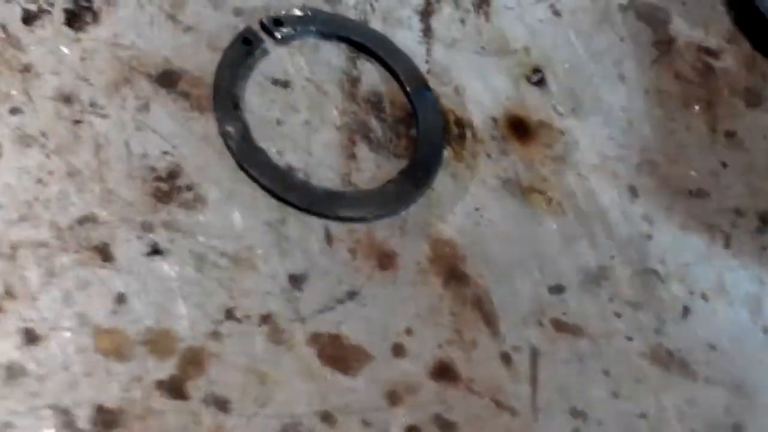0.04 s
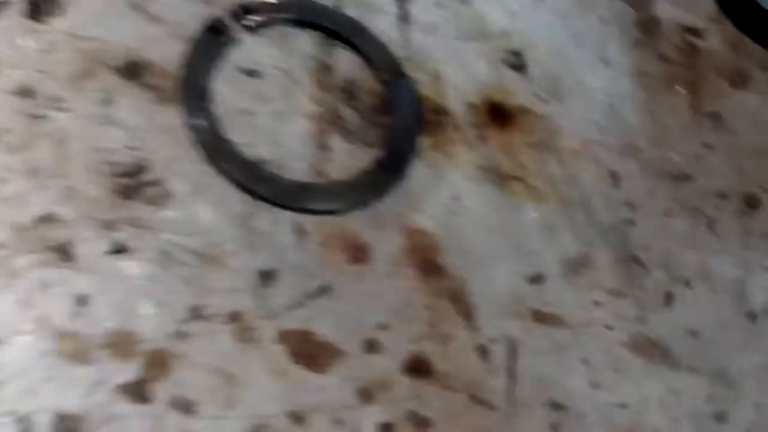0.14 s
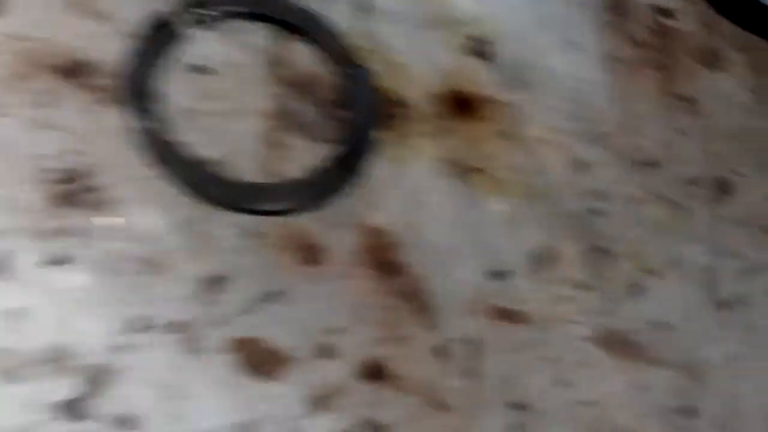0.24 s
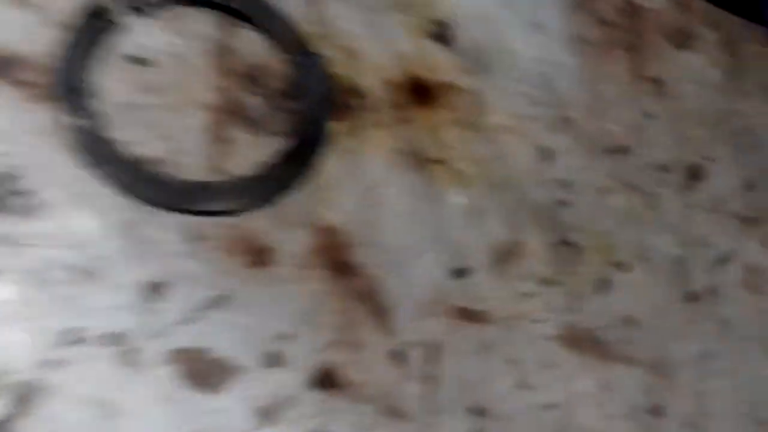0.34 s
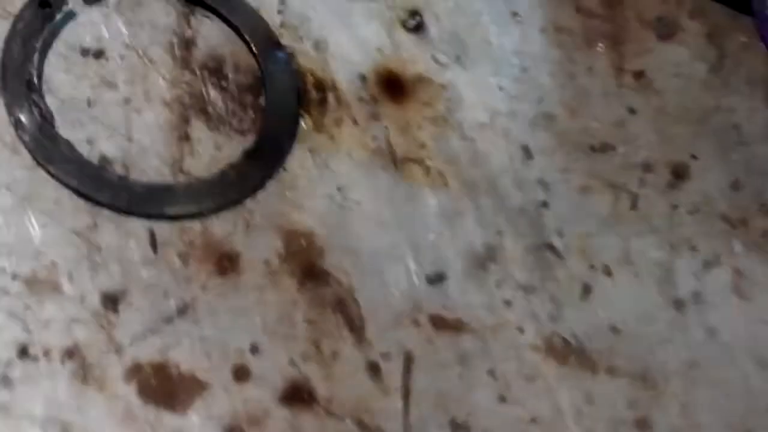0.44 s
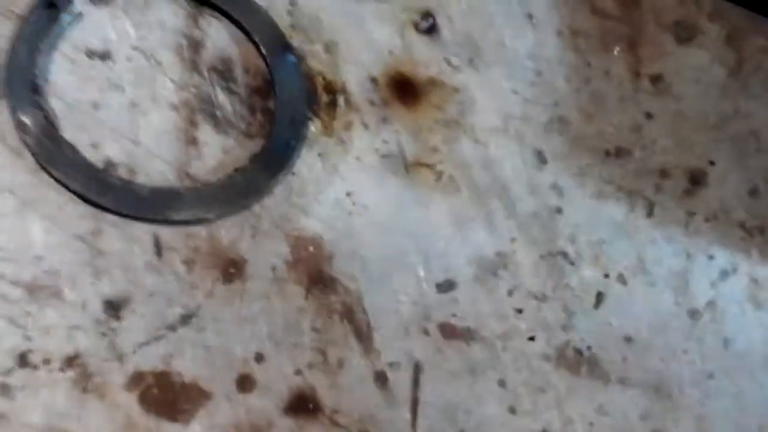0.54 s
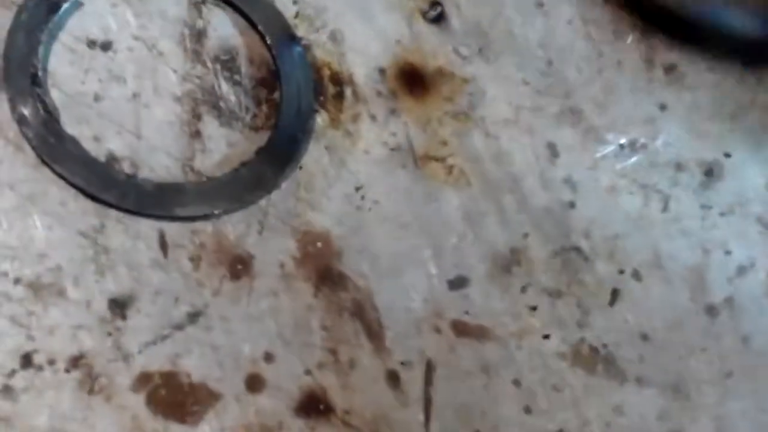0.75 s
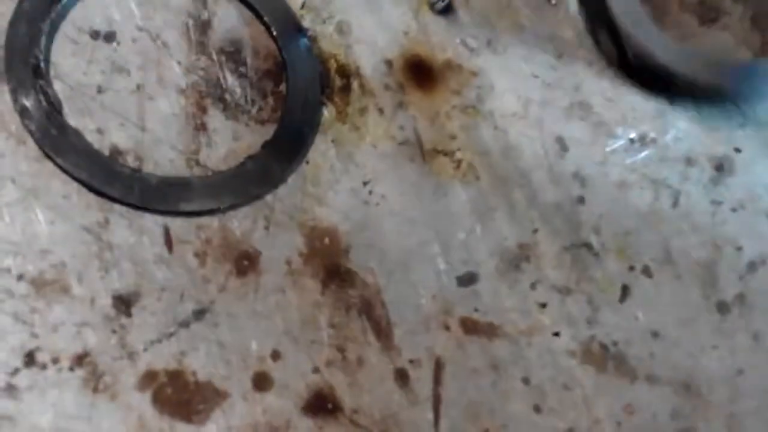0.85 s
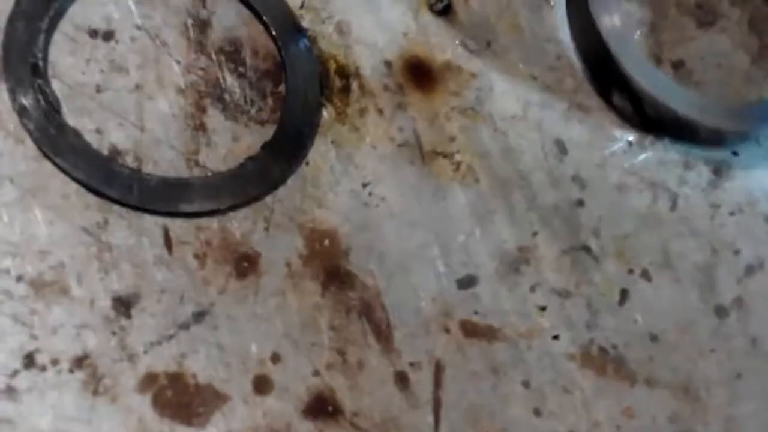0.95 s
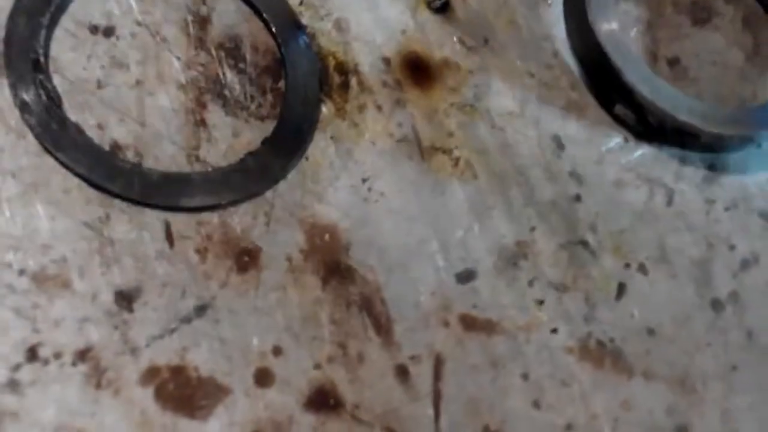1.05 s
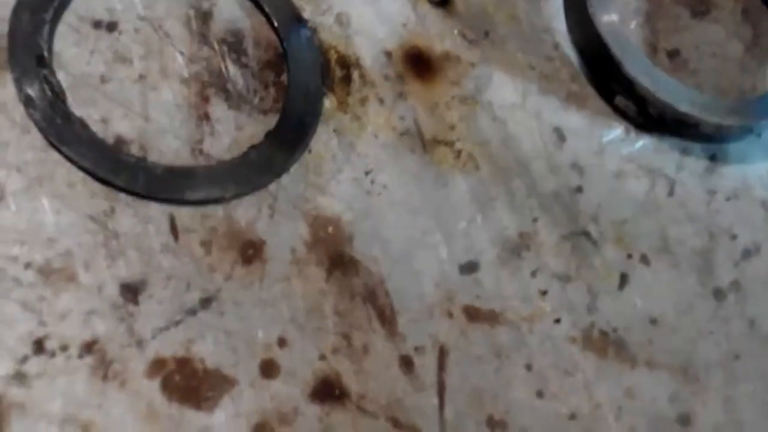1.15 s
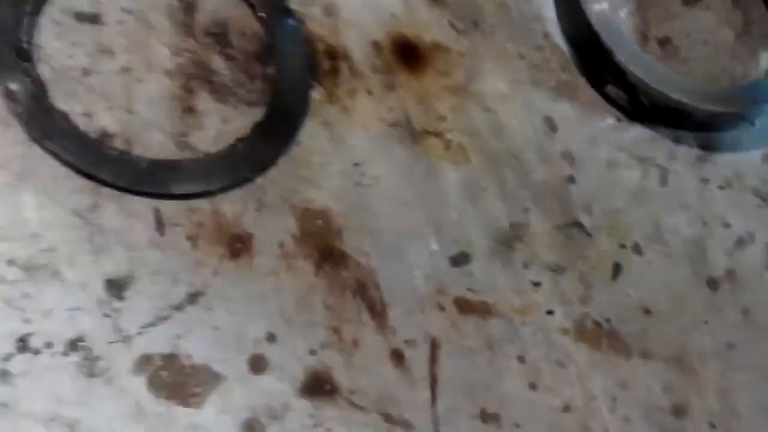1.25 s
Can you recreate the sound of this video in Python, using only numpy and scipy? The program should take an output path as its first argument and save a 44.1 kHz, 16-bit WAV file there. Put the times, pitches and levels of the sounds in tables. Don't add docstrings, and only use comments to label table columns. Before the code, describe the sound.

A steel ring ticks very faintly in the first 0.1 seconds over a low, unsteady motor hum. At 0.2 a heavy, rattling bang hits the far end of the sheet-metal bench and fades. At 0.82 the ring lands close with a loud bright clink, rocks and taps until 0.95, with gritty dragging and small knocks dwindling by 1.25. Short garage echo, phone microphone with little bass.

```python
import sys
import numpy as np
from scipy import signal
from scipy.fft import rfft, irfft, next_fast_len
from scipy.io import wavfile
from scipy.ndimage import map_coordinates

SR = 44100
rng = np.random.default_rng(int(sys.argv[2]) if len(sys.argv) > 2 else 0)


def inscribe(sig):
    pcm = np.round(np.clip(np.atleast_2d(sig).T, -1, 1) * 32767)
    wavfile.write(sys.argv[1], SR, pcm.astype(np.int16))


def boost_factor(decibels):
    exponent = np.asarray(decibels, float) / 20
    return 10 ** exponent


N = 57330

# [f/Hz, level/dB, t60/s]
SEATED_MODES = [(2112, -13.5, 0.028), (3290, -2.5, 0.018), (4033, -12, 0.13), (4130, -8.5, .08),
                (4206, -9.5, 0.07), (4148, 9.5, 0.019), (5024, -5, 0.023), (6480, -14, 0.045),
                (6536, -0.5, 0.016)]


def unit(x):
    return x / np.sqrt(np.mean(x ** 2) + 1e-20)


def along(points, hz):
    f, v = np.transpose(points)
    return np.interp(np.log(hz + 1), np.log(f + 1), v)


def curve(rows):
    return np.interp(np.arange(N) / SR, *np.transpose(rows))


def wobble(rate, size=N):
    return map_coordinates(rng.standard_normal(size), [np.arange(size) * rate / SR])


def filtered(x, response):
    m = next_fast_len(len(x) + SR // 2)
    spectrum = rfft(x, m) * response(np.fft.rfftfreq(m, 1 / SR))
    return irfft(spectrum, m)[:len(x)]


def shaped_noise(size, spectrum):
    return unit(filtered(rng.standard_normal(size), lambda f: boost_factor(along(spectrum, f))))


def peak(f, hz, width):
    return 1j * f * width / (hz * hz - f * f + 1j * f * width)


def dying(x, t60s, hold):
    hz, t, z = signal.stft(x, SR, nperseg=256)
    decay = boost_factor(-60 * np.maximum(t - hold, 0) / along(t60s, hz)[:, None])
    return signal.istft(z * decay, SR, nperseg=256)[1][:len(x)]


def ring():
    # [t/s, peak level/dB, high modes/dB, hoop mode/dB, low mode/dB]
    clinks = [
        (0.824, -8, -4.5, 0, 3),
        (0.8701, -19, -3.5, -8.5, -3.5),
        (0.9035, -26, -9, -5, -4),
        (0.9169, -23.5, -3.5, -13, 3.5),
        (0.9217, -28, -9.5, -5, -5),
        (0.9487, -17.5, -5.5, -20, 12),
        (1.087, -49, -7, -3, 37),
    ]
    # [t/s, level/dB, f/Hz]
    taps = [
        (0.001, -38.5, 3950),
        (0.016, -43.5, 3840),
        (0.03, -39, 4100),
        (0.042, -42, 4000),
        (0.05, -34.5, 3990),
        (0.057, -37, 4010),
        (0.061, -40, 4120),
        (0.125, -62, 3800),
    ]
    # [f/Hz, level/dB, t60/s]
    free_modes = [(1650, -25, 0.33), (4498, -9, .21), (6170, -10, 0.11), (7440, -26, .22),
                  (8360, -37, 0.16)]
    # [f/Hz, level/dB per Hz]
    crack_spectrum = [(300, -33), (1000, -1), (3500, -7), (5500, 0), (7000, -27), (9000, -46)]
    crack_db, crack_t60_s, contact_s = -16, 0.07, 0.00073
    scatter_db, scatter_rad = 1.8, 0.41
    tap_t60_s, tap_rise_s, upper_hz, upper_db = 0.035, 0.00095, 6170, -17

    modes = list(free_modes) + list(SEATED_MODES)
    out, t = np.zeros(N + SR), np.arange(SR // 2) / SR
    for start, db, high_db, hoop_db, low_db in clinks:
        luck = rng.standard_normal((len(modes), 2))
        strike_db = np.r_[low_db, hoop_db, high_db, high_db, high_db, np.zeros(len(SEATED_MODES))]
        tones = np.zeros(len(t))
        for (hz, level, t60), more, (a, b) in zip(modes, strike_db, luck):
            decay = boost_factor(level + more + scatter_db * a - 60 * t / t60)
            tones += decay * np.sin(2 * np.pi * hz * t + scatter_rad * b)
        crack = boost_factor(crack_db - 60 * t / crack_t60_s) * shaped_noise(len(t), crack_spectrum)
        rise = 1 - np.exp(-t / contact_s)
        out[round(start * SR):][:len(t)] += boost_factor(db - 7.5) * (tones + crack) * rise
    for start, db, hz in taps:
        tones = np.sin(2 * np.pi * hz * t) + boost_factor(upper_db) * np.sin(2 * np.pi * upper_hz * t)
        rise = 1 - np.exp(-t / tap_rise_s)
        out[round(start * SR):][:len(t)] += boost_factor(db - 60 * t / tap_t60_s) * tones * rise
    return out[:N]


def drag():
    slide = list([(0.84, -48.5), (0.885, -46), (0.9, -39.5), (0.925, -43.5), (0.94, -46.5), (1.03, -49),
                  (1.14, -55.5), (1.19, -61.5), (1.24, -70)])
    fidget = list([(0, -60.5), (.055, -59), (.1, -74), (.2, -94)])
    # [f/Hz, level/dB per Hz]
    grit_spectrum = [(200, -20.5), (500, -4), (1000, 2), (1700, 1), (3000, -5), (4300, 0), (6000, -21.5),
                     (8800, -49.5)]
    grains_per_s, grain_db, gain_db, ring_db = 5000, 1.5, 6, -19

    caught = rng.random(N) < grains_per_s / SR
    grains = caught * rng.standard_normal(N) * boost_factor(grain_db * wobble(60))
    grains = grains + 0.36 * rng.standard_normal(N)
    grit = unit(filtered(grains, lambda f: boost_factor(along(grit_spectrum, f))))
    seated = lambda f: sum(boost_factor(db) * peak(f, hz, 1.5 / t60) for hz, db, t60 in SEATED_MODES)
    sung = unit(filtered(grains, seated))
    still_before, still_after = (slide[0][0] - 0.02, -90), (slide[-1][0] + 0.03, -90)
    moving_db = curve(fidget + [still_before] + slide + [still_after])
    return boost_factor(moving_db + gain_db) * (grit + boost_factor(ring_db) * sung)


def bench():
    # [t/s, level/dB, hold/s, local panel f/Hz, panel level/dB]
    bang = [
        (0.1978, -20.5, 0.031, 770, -11),
    ]
    # [t/s, level/dB, hold/s, local panel f/Hz, panel level/dB]
    knocks = [(0.827, -42, .01, 540, 4), (0.84, -49, .02, 970, 3), (0.891, -37.5, 0.005, 730, -1.5),
              (0.901, -31.5, 0.0037, 700, 7.5), (0.912, -34, 0.0054, 1300, 20),
              (0.92, -39, .006, 1000, 1.5), (0.953, -36.5, 0.013, 1650, 23), (0.967, -40, .005, 780, 17),
              (1.002, -34, 0.0095, 746, 8.5), (1.009, -44.5, 0.021, 550, 9), (1.018, -39, 0.029, 920, 14),
              (1.043, -45.5, .01, 907, -2), (1.065, -47, 0.024, 847, -1.5), (1.109, -45, 0.023, 620, 13.5),
              (1.144, -45, 0.021, 880, 7), (1.258, -57.5, 0.011, 232, 16)]
    # [f/Hz, level/dB per Hz]
    sheet = [(29, -44), (50, -35), (109, -21.5), (328, -14), (780, -5), (1340, -8), (1890, -9.5),
             (4700, -10.5), (8800, -44), (11400, -77), (19400, -120)]
    # [f/Hz, width/Hz, level/dB]
    resonances = [(103, 75, 9.5), (534, 37, 10), (780, 25, 4), (920, 34, 2), (1084, 100, -3),
                  (1910, 170, -8.5), (3180, 80, -2), (4100, 200, -2.5), (4460, 300, -9.5)]
    # [f/Hz, t60/s]
    sheet_fade = [(80, 0.94), (210, 0.42), (560, 0.22), (1000, 0.28), (1470, 0.25), (3880, 0.22),
                  (8000, 0.2)]
    rise_s, rattle_hz, rattle_db = 0.0005, 398.4, 1
    panel_q = 6.2
    light_cut, light_fade = 0.2, 0.41

    out, t = np.zeros(N + SR), np.arange(SR // 2) / SR
    for k, (start, db, hold, panel_hz, panel_db) in enumerate(list(bang) + list(knocks)):
        light = k > 0

        def body(f):
            panel = 1 + boost_factor(panel_db) * abs(peak(f, panel_hz, panel_hz / panel_q)) ** 2
            bass_cut = 1 + (light * light_cut * panel_hz / (f + 1)) ** 2
            peaks = 1 + sum(boost_factor(g) * abs(peak(f, hz, width)) ** 2 for hz, width, g in resonances)
            return boost_factor(along(sheet, f)) * panel / bass_cut * peaks

        shaken = rng.standard_normal(len(t)) * boost_factor(rattle_db * wobble(rattle_hz, size=len(t)))
        fade = [(hz, t60 * (light_fade if light else 1)) for hz, t60 in sheet_fade]
        blow = dying(unit(filtered(shaken, body)), fade, hold)
        out[round(start * SR):][:len(t)] += boost_factor(db) * blow * (1 - np.exp(-t / rise_s))
    return out[:N]


def frame():
    # [t/s, level/dB, f/Hz]
    thumps = [
        (0.02, -59.5, 85),
        (0.824, -43.5, 130),
        (0.859, -50, 115),
        (0.9, -42.5, 300),
        (0.919, -58.5, 100),
        (0.951, -50.5, 129.5),
        (0.202, -29.5, 102),
    ]
    t60_s, rise_s = 0.2, 0.0036
    start, db, hz = np.transpose(thumps)[..., None]
    t = np.maximum(np.arange(N) / SR - start, 0)
    each = boost_factor(db - 60 * t / t60_s) * np.sin(2 * np.pi * hz * t) * (1 - np.exp(-t / rise_s))
    return each.sum(axis=0)


def walls(x):
    # [f/Hz, t60/s]
    wall_fade = [(500, .3), (3000, 0.84), (8000, 0.074)]
    gap_s = 0.0073
    tail = dying(rng.standard_normal(SR // 2), wall_fade, hold=0)
    late = np.pad(x, (round(gap_s * SR), 0))
    return signal.fftconvolve(late, tail / np.linalg.norm(tail))[:N]


def hum():
    # [f/Hz, level/dB per Hz]
    air_spectrum = [(24, -71.5), (40, -40.5), (162, -20), (212, -1), (326, -10.5), (719, -13.5),
                    (1180, -21), (4270, -20), (8800, -47.5), (11400, -73), (19400, -120)]
    # [t/s, level/dB]
    air_db = [(0.0, -52), (1.3, -54)]
    # [f/Hz, width/Hz, level/dB]
    motor = [(126, 43, -68), (213, 18.7, -55), (300, 8.7, -64), (431.3, 25, -64.5), (473.7, 78, -59.5),
             (723, 8.1, -61.5), (875, 16, -66), (867, 160, -57.5), (1290, 10, -72.5), (3870, 510, -65.5)]
    out = shaped_noise(N, air_spectrum) * boost_factor(curve(air_db) + 1.4 * wobble(17))
    for hz, width, db in motor:
        out += boost_factor(db) * unit(filtered(rng.standard_normal(N), lambda f: peak(f, hz, width) ** 2))
    return out


def scene():
    steel = ring()
    echo = boost_factor(-16.5) * walls(steel)
    return (steel + echo + bench() + frame() + drag() + hum())[None]


def roll_off(x):
    return signal.sosfilt(signal.butter(12, 9060, fs=SR, output="sos"), x)


def record(dry):
    low_hz, top_hz, top_slope_hz = 47.3, 8570, 96

    def microphone(f):
        top = 1 / (1 + np.exp(np.clip((f - top_hz) / top_slope_hz, -50, 9)))
        return top * (1j * f / (low_hz + 1j * f)) ** 2

    return roll_off(filtered(dry[0], microphone)[None])


dry = scene()
out = record(dry)
inscribe(out)
```